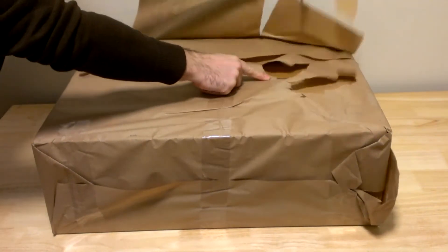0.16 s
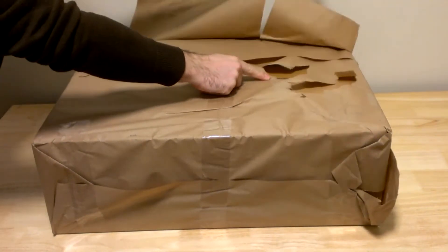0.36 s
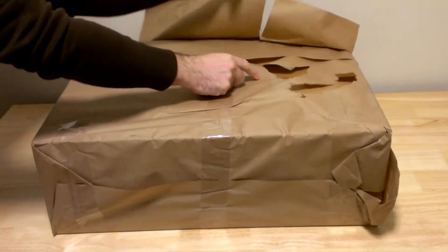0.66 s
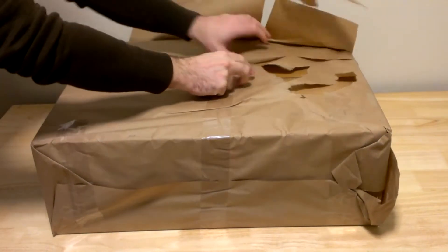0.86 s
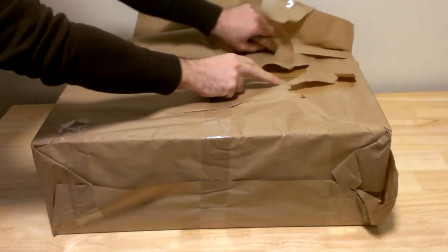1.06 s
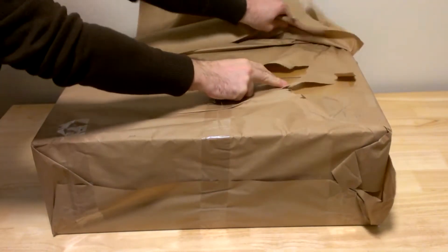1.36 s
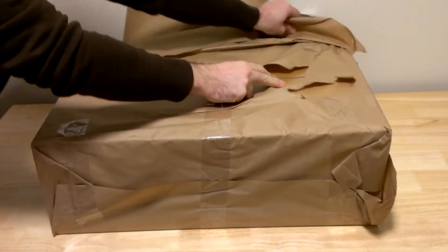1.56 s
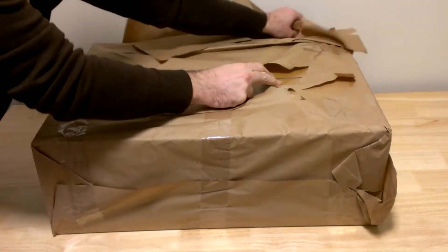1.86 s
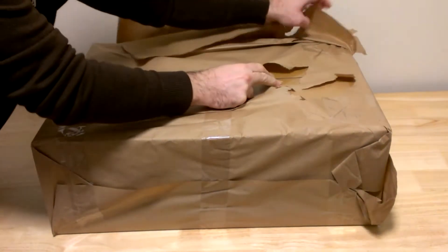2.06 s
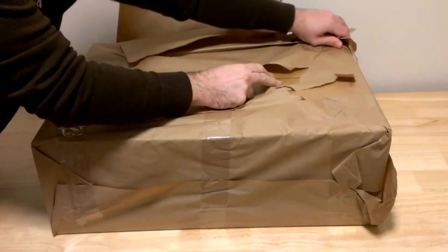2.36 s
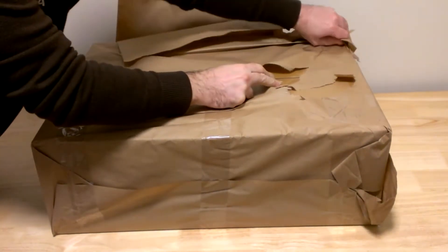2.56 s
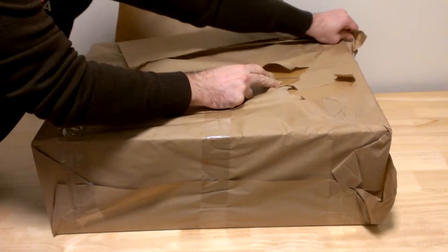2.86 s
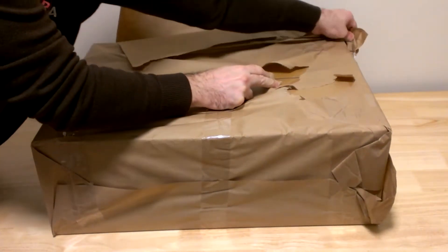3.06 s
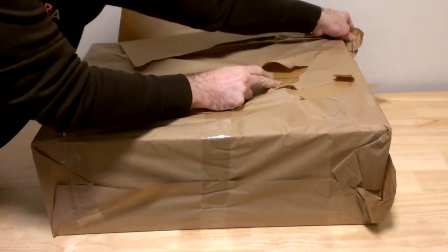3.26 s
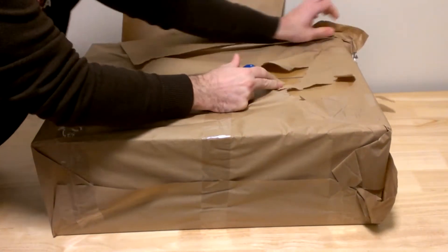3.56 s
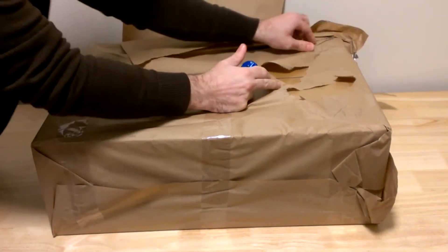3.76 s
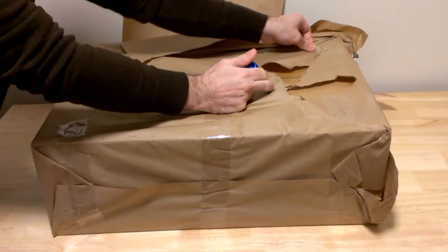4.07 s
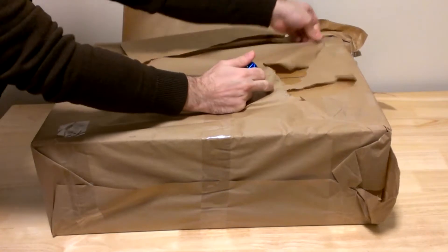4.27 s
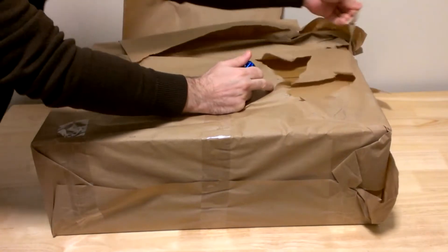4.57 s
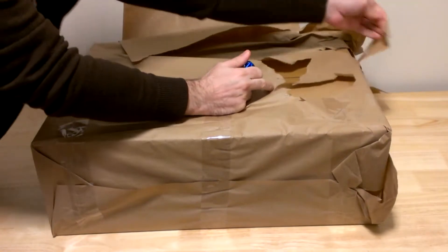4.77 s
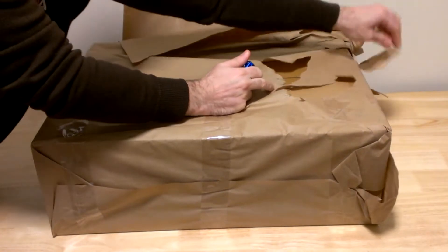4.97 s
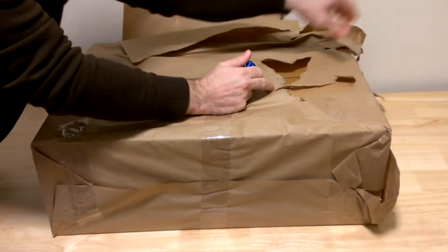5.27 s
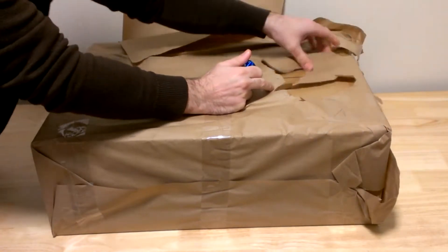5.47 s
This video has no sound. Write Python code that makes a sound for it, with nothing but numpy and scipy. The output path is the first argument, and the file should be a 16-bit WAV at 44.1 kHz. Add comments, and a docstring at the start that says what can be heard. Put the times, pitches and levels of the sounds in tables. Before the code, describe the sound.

Brown wrapping paper is torn and pulled off a cardboard box, heard close up in a small, hard-walled room with a faint hiss. A sharp snap at the start leads into a loud, bright rip from about 0.3 to 0.5 seconds. Uneven crinkling and small snaps follow. Around 1.3 seconds a hand leans on the lid with one soft, low thud, while the sheet rustles steadily until about 2 seconds. A sharp crack and a short tear come at 2.1 seconds, and the crackle briefly thins around 2.6. It builds again into loud snaps and another rip between 3.0 and 3.3 seconds. Lighter, scattered crinkles continue until about 4.5 seconds, when the rustling swells into a last quick tear near 4.7. The paper keeps crackling with a few smaller snaps and dies away at about 5.5 seconds.

```python
"""In a small, hard-walled room, brown wrapping paper is torn and pulled off a cardboard box.
Parting fibres and buckling creases radiate dense showers of impulses; now and then a whole fold snaps.
Each patch of the sheet has its own impulse response, with its own colour and echoes.
Paper and box filter the clicks, and the close microphone resonates near 5 kHz.
Beneath them lie the faint hiss of the room and one soft thud as a hand leans on the lid."""
import sys
import numpy as np
from scipy import signal
from scipy.fft import rfft, irfft, next_fast_len
from scipy.io import wavfile

SR = 44100
rng = np.random.default_rng(int(sys.argv[2]) if len(sys.argv) > 2 else 0)


def inscribe(sig):
    """Save sig as 16-bit PCM at rate SR to the path in sys.argv[1].

    A 1-D sig is mono; a 2-D sig holds one channel per row.
    Samples are clipped to [-1, 1] before scaling.
    """
    pcm = np.round(np.clip(np.atleast_2d(sig).T, -1, 1) * 32767)
    wavfile.write(sys.argv[1], SR, pcm.astype(np.int16))


N = 248283
TIME = np.arange(N) / SR
FFT_SIZE, RESPONSE_SIZE = next_fast_len(N + SR // 2), 2 ** 14
HZ = np.fft.rfftfreq(FFT_SIZE, 1 / SR)


def gain_of(db):
    """The decibel law: 20 dB is a factor of ten in amplitude."""
    return 10 ** (np.asarray(db) / 20)


def unit_rms(x):
    """Normalisation to a mean power of one."""
    return x / np.sqrt(np.mean(abs(x) ** 2) + 1e-20)


def curve_at(points, hz):
    """Interpolation of a table on a logarithmic frequency axis."""
    frequency, value = np.transpose(points)
    return np.interp(np.log(hz + 1), np.log(frequency + 1), value)


def add(mix, start_s, sound):
    """Superposition: a stereo sound adds to the mix from start_s on."""
    part = mix[:, max(round(start_s * SR), 0):][:, :sound.shape[1]]
    part += sound[:, :part.shape[1]]


def minimum_phase(gain):
    """Causality: a gain curve gets the phase of a resonator, which rings only after the blow."""
    cepstrum = irfft(np.log(np.maximum(gain, 1e-5)))
    half = len(cepstrum) // 2
    return np.exp(rfft(np.r_[cepstrum[:1], 2 * cepstrum[1:half]], len(cepstrum)))


def wander(per_s):
    """Random modulation: straight lines join Gaussian values drawn per_s times a second."""
    knots = np.arange(0, TIME[-1] + 1, 1 / per_s)
    return np.interp(TIME, knots, rng.standard_normal(N)[:len(knots)])


def impulses(shape, per_s):
    """A Poisson process: independent impulses of Gaussian size."""
    return rng.standard_normal(shape) * (rng.random(shape) < per_s / SR)


def registers(hz, body_hz=1900, fizz_hz=7200):
    """Complementary bands: the shares of body (low), crackle (middle) and fizz (high) sum to one."""
    body = 1 / (1 + (hz / body_hz) ** 3)
    fizz = 1 - 1 / (1 + (hz / fizz_hz) ** 6)
    return body, 1 - body - fizz, fizz


# Still air of the room: (frequency [Hz], relative spectrum level [dB])
AIR_SPECTRUM = [(30, -15), (120, -4), (300, 10), (1000, 7.5), (3000, -3), (4800, -12), (8000, -7),
                (16000, -19)]
def room_air(level_db=-67):
    """Ambient noise: a faint, stationary hiss of filtered white noise."""
    spectrum = rfft(rng.standard_normal((2, FFT_SIZE))) * gain_of(curve_at(AIR_SPECTRUM, HZ))
    return gain_of(level_db) * unit_rms(irfft(spectrum, FFT_SIZE)[:, :N])


# Air mode of the box: (level of the decay envelope [dB], frequency [Hz], T60 [s])
BOX_AIR_MODE = (-33, 156, 0.085)
def lid_thud(start_s=1.26, rise_s=0.023):
    """Cavity resonance: a soft push on the lid sets the enclosed air into damped oscillation."""
    db, hz, t60 = BOX_AIR_MODE
    t = np.maximum(TIME - start_s, 0)
    envelope = gain_of(db - 60 * t / t60) * (1 - np.exp(-t / rise_s))
    return envelope * np.sin(2 * np.pi * hz * t)


# Reverberation time of the room: (frequency [Hz], T60 [s])
ROOM_T60 = [(150, 0.21), (500, 0.23), (5000, 0.23), (9000, 0.22), (15000, 0.18)]
# Likeness of the echoes at the two microphones: (frequency [Hz], coherence [ratio, clipped to 0-1])
COHERENCE = [(100, 1.2), (280, 0.66), (550, 0.95), (1000, 0.64), (2000, 0.26), (4500, 0.48), (12000, -0.24)]
def patch_response(room_db, colour_db, early_db=1, early_s=0.012, tail_db=2, dull_hz=9000):
    """Multipath propagation: a click on one patch arrives directly, as echoes and as reverberation."""
    size = RESPONSE_SIZE
    t, hz = np.arange(size) / SR, np.fft.rfftfreq(size, 1 / SR)
    echoes = impulses((2, size), per_s=4000) * np.exp(-t / early_s) * (t > .0004)
    band_hz, frame_s, noise = signal.stft(rng.standard_normal((2, size)), SR, nperseg=256)
    decay = gain_of(-60 * frame_s / curve_at(ROOM_T60, band_hz)[:, None])
    tail = signal.istft(noise * decay, SR, nperseg=256)[1][:, :size]
    tail *= 1 - np.exp(-t / 0.0069)  # the diffuse field builds up
    room = gain_of(early_db) * unit_rms(echoes) + gain_of(tail_db) * unit_rms(tail)
    room *= gain_of(room_db) / np.sqrt(size)
    left, independent = rfft(room) / np.sqrt(1 + (hz / dull_hz) ** 2)  # reflections lose treble
    coherence = np.clip(curve_at(COHERENCE, hz), 0, 1)
    right = coherence * left + np.sqrt(1 - coherence ** 2) * independent
    paths = 1 + np.array([left, right])  # 1 is the direct sound
    ripple_db = colour_db * np.interp(hz, np.geomspace(150, 16000, 22), rng.standard_normal(22))
    return irfft(paths * minimum_phase(gain_of(ripple_db)))


# Paper as heard at the microphone: (frequency [Hz], relative spectrum level [dB])
PAPER_SPECTRUM = [(60.0, -54.5), (120.0, -48.5), (200.0, -26), (300.0, -18.5), (400.0, -13), (560.0, -13),
                  (1050.0, -9.5), (1600.0, -11), (2500.0, -7.5), (3600.0, -5), (4800.0, 1.0), (6600.0, -12),
                  (10000.0, -19.5), (16000.0, -21)]
# Peaks and dips of the box, then a shallow dip near 2.7 kHz, last the microphone's ring: (frequency [Hz],
# bandwidth [Hz], gain [dB])
RESONANCES = [(160, 64, 2), (262, 16, -2.5), (444, 23, 6), (475, 20, -1), (627, 330, -0.5), (768, 15, 4),
              (1060, 90, 1), (2720, 770, -0.53), (5070, 890, 1.5)]
# Level difference between the microphones: (frequency [Hz], left over right [dB])
BALANCE = [(200, -1.5), (550, 1.5), (1100, -0.3), (2200, 0.9), (4600, 6.5), (7500, 3.5), (12000, 6.5)]
def paper_and_box(clicks):
    """Source and filter: paper and box colour the clicks; the left microphone gets more treble."""
    resonance_db = sum(db / (1 + (2 * (HZ - hz) / width) ** 2) for hz, width, db in RESONANCES)
    colour = minimum_phase(unit_rms(gain_of(curve_at(PAPER_SPECTRUM, HZ) + resonance_db)))
    lean = gain_of(curve_at(BALANCE, HZ))
    sides = np.array([lean, np.ones_like(lean)]) / np.sqrt((1 + lean ** 2) / 2)  # constant power
    return irfft(rfft(clicks, FFT_SIZE) * colour * sides, FFT_SIZE)[:, :N]


# Folds that snap: (time [s], strength [dB], body gain [dB], fizz gain [dB], settling [s], ring [Hz])
FOLDS = [(0.0571, 8, -17, 5.5, 0.008, 3900), (0.2769, 6, -8.5, 4, 0.018, 4830),
         (0.702, 0, 0.5, -4, 0.006, 1130), (0.815, -19, 10, 11, 0.022, 5400),
         (0.851, -11.5, 8, 9, 0.008, 5600), (1.0024, -1, 5, -4, 0.0065, 3280),
         (1.1143, 2, -6.5, 0.5, 0.0042, 3770), (1.21, -17.5, -11, 23.5, 0.0015, 6700),
         (1.2514, -8, -0.5, 12, 0.016, 3300), (1.969, -7, 7, 6, 0.011, 400),
         (2.0995, 9.5, 1.5, 8, 0.0095, 1010), (2.368, -4.5, 10.5, 2, 0.012, 5660),
         (2.5963, -18.5, 1.5, 13.5, 0.035, 4440), (2.702, -14.5, 0, 15, 0.011, 5200),
         (3.028, 6, -4.5, 6, 0.019, 4770), (3.09, 3, 12, 14, 0.016, 5600), (3.2954, 2, 2, 8, 0.027, 4870),
         (3.376, -2.5, -1, 9.5, 0.022, 4440), (3.552, -0.5, -6, 13.5, 0.015, 2250),
         (4.043, -18, -2, 5, 0.032, 5630), (4.1295, -17.5, -6, 3, 0.003, 4700),
         (4.1824, -8.5, -12, 11.5, 0.038, 3360), (4.44, -14, -6, 5, 0.036, 4970),
         (4.4943, 0, -10.5, 9.5, 0.0014, 5600), (4.511, -4, -13, 6, 0.011, 2440),
         (5.0632, -2.5, -1, 3, 0.01, 3280), (5.1845, -9, -12, 9, 0.0075, 4900),
         (5.2706, -7, 3.5, 8, 0.021, 3700), (5.388, -6, -12, 3, 0.026, 4300)]
def fold_snaps(level_db=-2.0, first_click_db=-3, ring_width=0.24, unit_energy_s=0.0058):
    """Snap-through buckling: a fold gives way in one sharp click, and smaller ones follow as it settles."""
    out, padded = np.zeros((2, N)), 2 * RESPONSE_SIZE
    t, hz = np.arange(RESPONSE_SIZE) / SR, np.fft.rfftfreq(padded, 1 / SR)
    low, middle, high = registers(hz)
    for start_s, db, body_db, fizz_db, settle_s, ring_hz in FOLDS:
        run = impulses(RESPONSE_SIZE, per_s=3500) * np.exp(-t / settle_s)
        run = unit_rms(run) * np.sqrt(settle_s / unit_energy_s / RESPONSE_SIZE)
        run[0] = gain_of(first_click_db)
        ring_db = 4.5 * np.log2(7500 / ring_hz)  # a larger fold rings lower and more strongly
        ring = gain_of(ring_db / (1 + (np.log((hz + 1) / ring_hz) / ring_width) ** 2))
        colour = minimum_phase(ring * (low * gain_of(body_db) + middle + high * gain_of(fizz_db)))
        paths = rfft(patch_response(room_db=1.0, colour_db=-0.5), padded)
        add(out, start_s, gain_of(db + level_db) * irfft(rfft(run, padded) * colour * paths))
    return out


def hand_move(start_s, length_s, level_db, swell_db, attack_s, release_s):
    """Amplitude envelope: the hand takes hold, swells or slackens steadily, and lets go."""
    t = TIME - start_s
    ramp_db = swell_db * (np.clip(t / length_s, 0, 1) - .5)
    attack = np.clip(t / attack_s, 0, 1)
    release = np.exp(-np.maximum(t - length_s, 0) / release_s)
    return gain_of(level_db + ramp_db) * attack * release


def band_power(level, body_db, fizz_db, hollow_db=0):
    """Power goes as amplitude squared in deep body, upper body, crackle and fizz; a flap sounds hollow."""
    return np.outer(gain_of([body_db + hollow_db, body_db - hollow_db, 0, fizz_db]), level) ** 2


# Body (the flexing sheet) and fizz (parting fibres) are relative to the crackle level.
# Faint ticking of the held sheet: (crackle level [dB], body [dB], fizz [dB])
HELD_SHEET = (-57.5, 1.6, 16)
# Strokes that drag or crumple the loose sheet:
# (time [s], duration [s], crackle level [dB], swell [dB], body [dB], fizz [dB], hollowness [dB])
HAND_STROKES = [(-0.03, 0.042, -27, 0.5, -6, 0, 0.5), (0.056, 0.21, -28, 7.5, -4.5, 3, -1),
                (0.473, 0.2, -27, -10, -3.5, 2.5, 0.5), (0.697, 0.037, -34.5, 2, -2.5, 1, 6),
                (0.855, 0.12, -29, -1.5, -1, -3.5, 1.5), (1.009, 0.066, -30.5, -1, -1.5, -2, -0.5),
                (1.109, 0.033, -36, -3, 0, 7, 3), (1.226, 0.34, -27.5, 5, 0.5, 0, -1.5),
                (1.546, 0.53, -27, -5.5, 2.5, 1, -1), (2.16, 0.26, -28.5, -1, -0.5, 0.5, -1.5),
                (2.413, 0.083, -34.5, -11, 5.5, -18, -3.5), (2.692, 0.096, -36.5, 5.5, -2, 8.5, 3),
                (2.814, 0.27, -29, 8.5, 5.5, 5.5, 0), (3.24, 0.28, -30.5, -6, -1, 4, -1),
                (3.55, 0.086, -31.5, -5, -7.5, 5, 4), (3.701, 0.2, -34.5, -1, 3.5, 7.5, 0.5),
                (4.169, 0.087, -33.5, -2.5, -10, 7.5, -6), (4.278, 0.065, -35, -0.5, -2.5, 7.5, 3),
                (4.481, 0.23, -25.5, 7, -9.5, 1, 0.5), (4.716, 0.15, -25, -8, 3, 5.5, -0.5),
                (4.854, 0.37, -29.5, -1.5, -4, 6.5, 7), (5.275, 0.088, -36.5, -4, -0.5, 11.5, 1.5),
                (5.363, 0.094, -36.5, -8, -2, 14.5, -1)]
# Tears running through the sheet: (time [s], duration [s], crackle level [dB], body [dB], fizz [dB])
TEARS = [(0.276, 0.2, -15.5, -1.5, 5), (1.57, 0.083, -25.5, 4, -5), (2.093, 0.065, -18.5, -4, 3.5),
         (3.081, 0.16, -17, -3, 4), (4.653, 0.092, -18, -4.5, 2)]
def handling(let_go_s=5.5):
    """Incoherent addition: holding, strokes and tears sum in power to give each band's amplitude."""
    db, body, fizz = HELD_SHEET
    power = band_power(gain_of(db) * (TIME < let_go_s), body, fizz)
    for start, length, db, swell, body, fizz, hollow in HAND_STROKES:
        stroke = hand_move(start, length, db, swell, attack_s=0.03, release_s=0.017)
        power += band_power(stroke, body, fizz, hollow)
    for start, length, db, body, fizz in TEARS:
        tear = hand_move(start, length, db, swell_db=0, attack_s=0.029, release_s=0.011)
        power += band_power(tear, body, fizz)
    return np.sqrt(power)


def fibre_crackle(patches=10, level_db=0.05, clicks_per_s=3600, crowding=.3, spread_db=3.5, hollow_hz=750):
    """Acoustic emission: a harder pull breaks more fibres, and the tear advances in fits."""
    envelopes = handling()
    pull_db = 20 * np.log10(envelopes[2] + 1e-9) + 29.5  # clicks_per_s holds at a pull of 0 dB
    chance = np.minimum(clicks_per_s / SR * gain_of(crowding * pull_db), 1)
    sizes = unit_rms(gain_of(spread_db * np.minimum(rng.exponential(1, N), 4)))
    signs = rng.choice([-1, 1], N)
    clicks = sizes * signs * (rng.random(N) < chance) / np.sqrt(chance)  # same power at any rate
    fits_db = 1.5 * wander(per_s=90) + wander(per_s=22)  # fast stutter and slower slips
    clicks *= gain_of(level_db) * unit_rms(gain_of(fits_db))
    active_patch = np.floor(TIME * 5 + 1.2 * rng.standard_normal(N)) % patches  # creeps along the sheet
    low, middle, high = registers(HZ)
    deep = low / (1 + (HZ / hollow_hz) ** 4)  # a hollow flap moves its body down into this range
    shares = np.array([deep, low - deep, middle, high])
    spectrum = 0
    for patch in range(patches):
        bands = rfft(clicks * (active_patch == patch) * envelopes, FFT_SIZE) * shares
        spectrum += bands.sum(0) * rfft(patch_response(room_db=0.5, colour_db=2.5), FFT_SIZE)
    return irfft(spectrum, FFT_SIZE)[:, :N]


def scene():
    """Linear superposition of filtered crackle and snaps, the thud and the air of the room."""
    return paper_and_box(fibre_crackle() + fold_snaps()) + lid_thud() + room_air()


def record(dry, ceiling=0.71, knee=7, cutoff_hz=16000):
    """Soft saturation rounds the loudest peaks; a low-pass filter then limits the bandwidth."""
    rounded = dry / (1 + abs(dry / ceiling) ** knee) ** (1 / knee)
    low_pass = signal.firwin(511, cutoff_hz, window=("kaiser", 9), fs=SR)
    return signal.oaconvolve(rounded, low_pass[None], "same")


dry = scene()
out = record(dry)
inscribe(out)
```